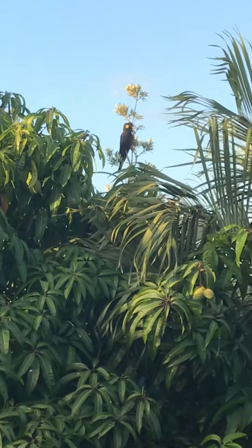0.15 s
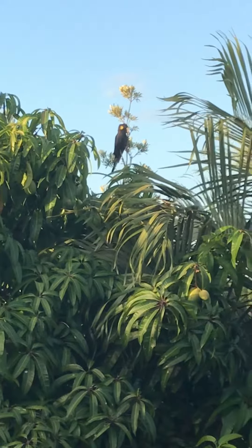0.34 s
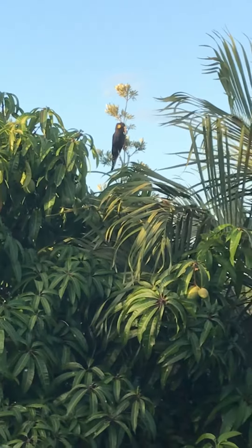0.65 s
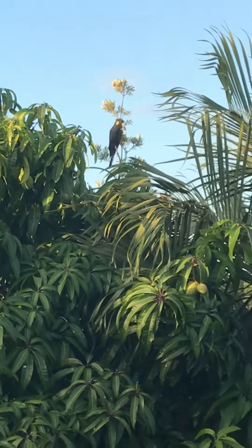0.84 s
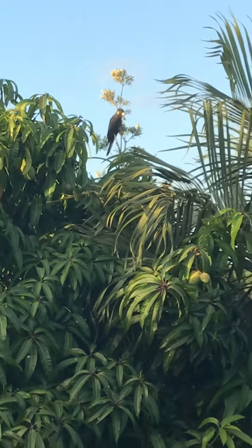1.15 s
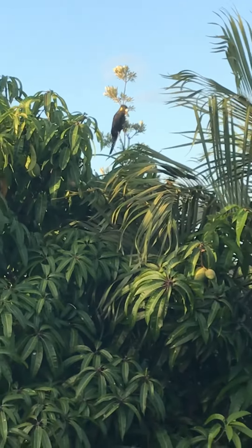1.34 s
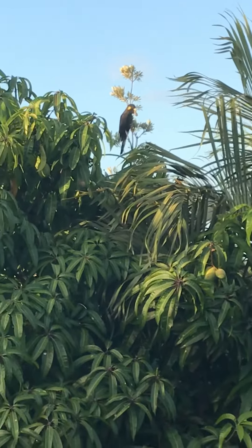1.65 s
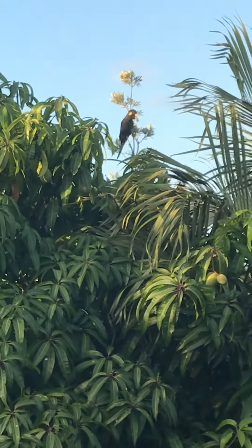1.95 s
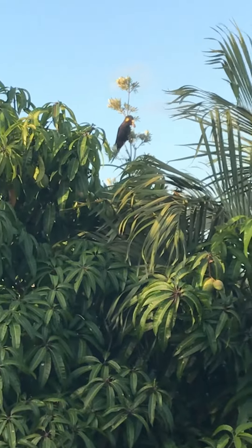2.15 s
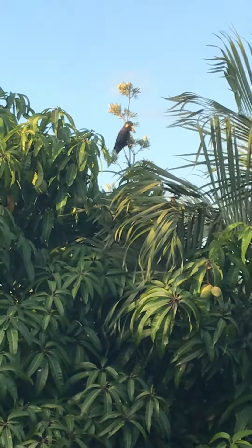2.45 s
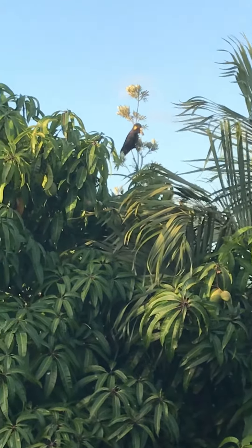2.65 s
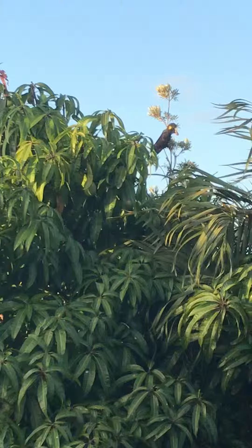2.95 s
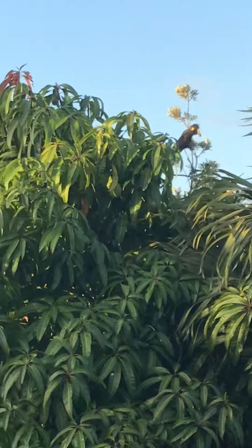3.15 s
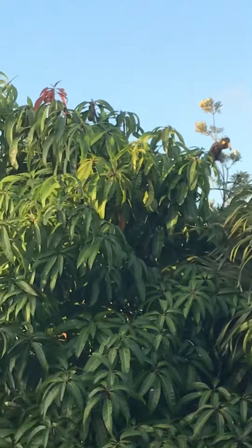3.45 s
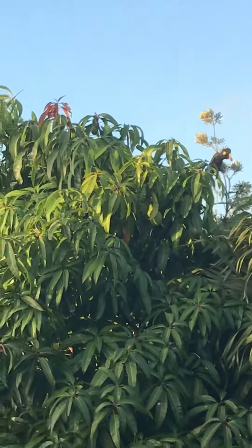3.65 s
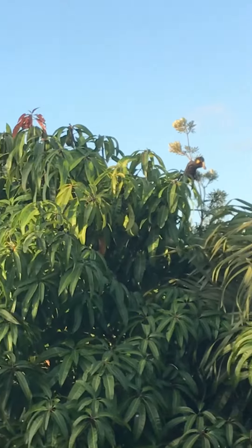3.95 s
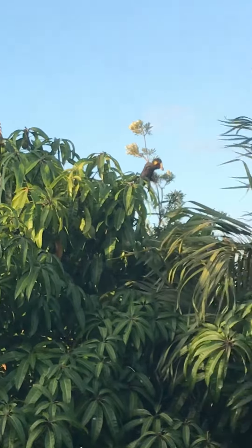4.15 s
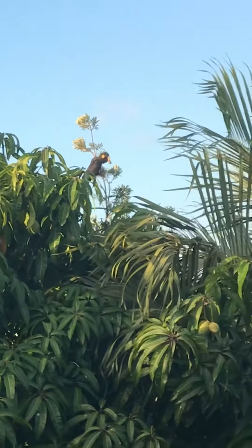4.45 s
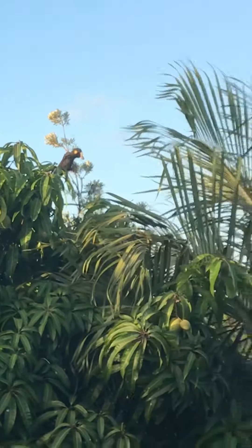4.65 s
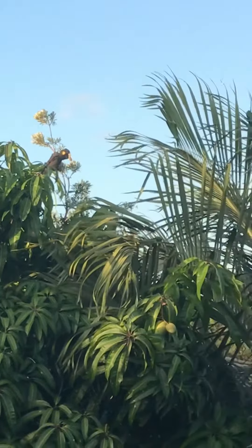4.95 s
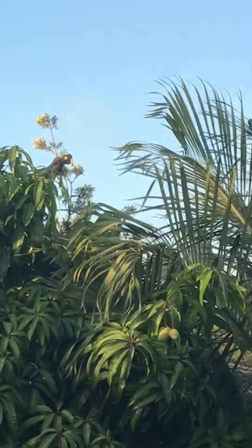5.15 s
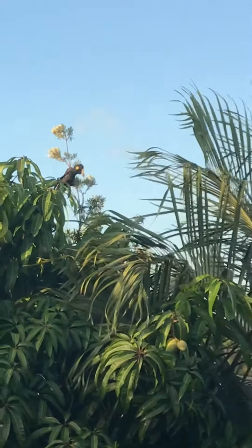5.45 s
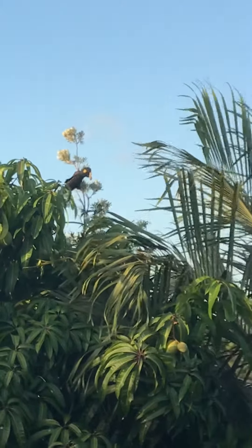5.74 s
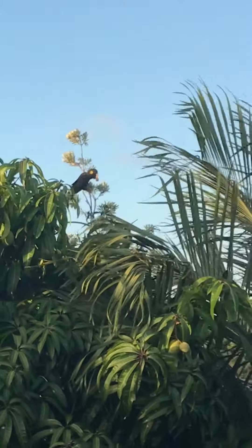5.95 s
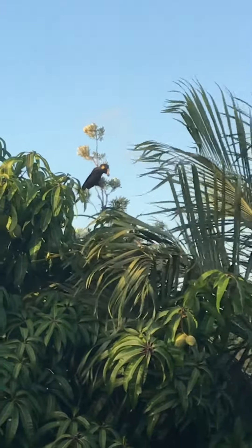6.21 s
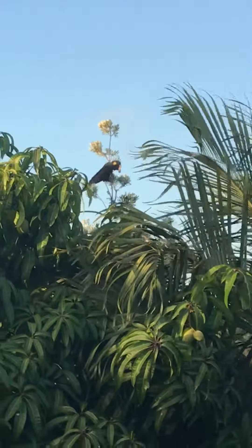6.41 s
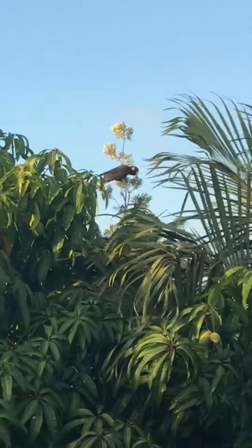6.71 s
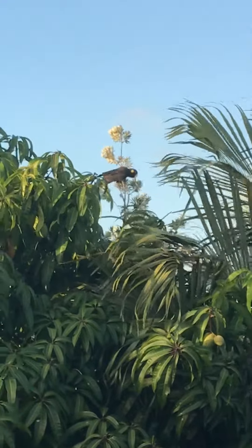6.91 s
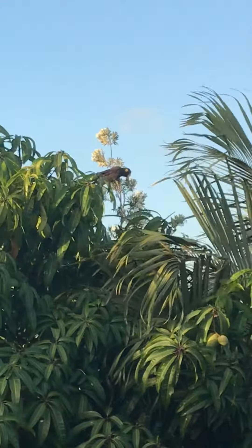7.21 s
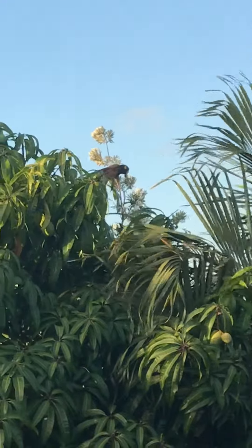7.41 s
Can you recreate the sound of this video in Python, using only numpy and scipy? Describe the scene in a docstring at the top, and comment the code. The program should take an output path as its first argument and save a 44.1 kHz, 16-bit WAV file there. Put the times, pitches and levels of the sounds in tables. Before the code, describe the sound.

A large cockatoo calls from a treetop in a quiet garden. Three long wails each rise from a creak into a piercing, wavering whistle, sag and end in a short torn rasp. The first and last are followed by a softer whine. A brief outdoor echo follows each call. Distant rumble, soft hiss and a few leaf ticks lie behind, heard by a handheld microphone some way off.

```python
"""A black cockatoo in a treetop gives three long wailing calls, two of them trailed by a softer whine.
Each call climbs out of a low creak (harmonics of slow pulses filtered by the throat), locks into a high or
a low whistle (a few harmonics of a nearly steady vibration) and breaks up into a harsh rasp (chaotic slaps
and turbulent air ringing the throat). The garden echoes it briefly with a tail of decaying noise; behind are
a distant rumble, a faint hiss and stirring leaves (all filtered noise) and a few leaf ticks (noise bursts)."""
import sys
import numpy as np
from scipy import signal
from scipy.fft import rfft, irfft
from scipy.io import wavfile
from scipy.ndimage import uniform_filter1d, map_coordinates

SR = 44100
rng = np.random.default_rng(int(sys.argv[2]) if len(sys.argv) > 2 else 0)


def master(y):
    """Save y as 16-bit WAV."""
    cut = np.clip(np.atleast_2d(y).T, -1, 1)
    pcm = np.round(cut * 32767)  # scale
    wavfile.write(sys.argv[1], SR, pcm.astype(np.int16))


N = 333989
T = np.arange(N) / SR  # time in seconds

# Overtones of the low register. Each row: harmonic number, relative level in dB.
LOW_OVERTONES = [(3, 4.5), (4, -3.5), (5, -4.5), (6, -11), (7, -12), (8, -19), (9, -28)]
# As the low register sags, its octave slides into a throat resonance.
# Each row: pitch in Hz, level of the octave over the fundamental in dB.
OCTAVE_LIFT = [(1620, -14), (1690, 10), (1760, -3.5), (1820, -11), (1880, -2.5), (1950, -18.5)]
# Resonances of throat and open beak during the creak. Each row: frequency in Hz, relative level in dB.
THROAT = [(500, -25), (850, -10), (1200, -3.5), (1550, -0.5), (1870, -0.5), (2100, 7.5), (2400, 1.5),
          (2820, -2), (3150, 1.5), (3600, -4), (4400, -5), (5600, -14), (6600, -24.5), (9000, -26.5),
          (13000, -37), (16000, -50)]
# Harsh endings. Each row: start in seconds, end in seconds, level in dB, then relative to that level
# the upper resonance in dB, the treble in dB and the pitched growl in dB.
RASPS = [(1.765, 1.84, -31, -10, -13.5, -4.5), (3.217, 3.368, -30.5, -11.5, -12.5, -1.5),
         (4.862, 5.035, -32, -6.5, -10, -5)]


def undb(db):
    """Logarithmic level: decibels to amplitude gain."""
    return 10 ** (np.asarray(db) / 20)


def unit(x):
    """Power normalisation: scale to rms 1."""
    return x / np.sqrt(np.mean(x ** 2) + 1e-18)


def at_hz(points, hz):
    """Transfer function: gain of a (Hz, dB) spectrum, falling 60 dB per octave outside its ends."""
    f, db = np.transpose(points)
    octave = np.log2(np.maximum(hz, 1))
    outside = np.abs(octave - np.clip(octave, np.log2(f[0]), np.log2(f[-1])))
    return undb(np.interp(octave, np.log2(f), db) - 60 * outside)


def colour(x, points):
    """Linear filtering: multiply the spectrum of a sound by a (Hz, dB) curve; rms 1."""
    hz = np.arange(len(x) // 2 + 1) * SR / len(x)
    return unit(irfft(rfft(x) * at_hz(points, hz), len(x)))


def noise(points):
    """Filtered white noise with a (Hz, dB) spectrum; rms 1."""
    return colour(rng.standard_normal(N), points)


def walk(rate, t=T):
    """Band-limited fluctuation: random values drawn rate times a second, joined smoothly; spread near 1."""
    steps = rng.standard_normal(16384)
    return map_coordinates(steps, [(t - t[0]) * rate], order=2, mode="wrap")


def follow(rows, fade_s=.006):
    """Amplitude gating: sample indices, soft on-off gate and interpolated control curves of one note."""
    s, *columns = np.transpose(rows)
    i = np.flatnonzero((T > s[0] - fade_s) & (T < s[-1] + fade_s))
    to_edge = np.minimum(T[i] - s[0], s[-1] - T[i])
    ramp = np.clip((to_edge + fade_s) / (2 * fade_s), 0, 1)
    return i, np.sin(ramp * np.pi / 2) ** 2, [np.interp(T[i], s, c) for c in columns]


def syrinx(t, hz, waver, jitter, shimmer):
    """Perturbed oscillation: phase and strength of the vibrating membrane, never quite steady."""
    steady_hz = uniform_filter1d(hz, size=400, mode="nearest")
    hz = steady_hz * (1 + waver * walk(73.1, t) + jitter * walk(1500, t))
    return 2 * np.pi * np.cumsum(hz) / SR, 1 + shimmer * walk(1800, t)


def whistles(notes, overtones, gain_db=0, top_db=0, octave_lift=None):
    """Harmonic synthesis: clear wails whose partials flutter independently on the way through the foliage."""
    out = np.zeros(N)
    total_db = 10 * np.log10(sum(undb(db) ** 2 for _, db in overtones))
    flutter_db = 2.1
    for rows in notes:
        i, gate, (hz, level_db, treble_db) = follow(rows)
        phase, strength = syrinx(T[i], hz, waver=.002, jitter=.002, shimmer=.012)
        levels = [level_db]
        if octave_lift:  # fundamental and octave share the level
            lift_db = np.interp(hz, *np.transpose(octave_lift))
            first_db = level_db - 10 * np.log10(1 + undb(lift_db) ** 2)
            levels = [first_db, first_db + lift_db]
        # the overtones together carry the treble level
        levels += [treble_db + top_db + db - total_db for _, db in overtones]
        voice = 0
        for k, db in enumerate(levels, start=1):
            voice = voice + undb(db + flutter_db * walk(93.66, T[i])) * np.sin(k * phase)
        out[i] += gate * (np.sqrt(2) * strength * voice + side_tones(T[i], phase, hz))
    return out * undb(gain_db)


def swoops():
    """Frequency glide: straight sweeps in the low register, louder as the pitch rises."""
    # Quick swoops between a creak and a whistle. Each row: start in seconds, end in seconds, first pitch in Hz,
    # last pitch in Hz, mid-glide level in dB and treble level in dB (both before the gains below).
    glides = [(1.147, 1.181, 1680, 1924, -31.5, -47), (2.057, 2.123, 1620, 2020, -42.5, -56),
              (2.649, 2.678, 1760, 1938, -31.5, -45), (4.265, 4.28, 1662, 1813, -35, -49.5),
              (5.477, 5.507, 1674, 1390, -49, -64)]
    swell_db_per_octave = 36
    notes = []
    for start, end, first_hz, last_hz, db, treble_db in glides:
        half_db = swell_db_per_octave * np.log2(last_hz / first_hz) / 2
        notes.append([(start, first_hz, db - half_db, treble_db - half_db),
                      (end, last_hz, db + half_db, treble_db + half_db)])
    return whistles(notes, LOW_OVERTONES, gain_db=1, top_db=1, octave_lift=OCTAVE_LIFT)


def undertones():
    """Superposition: an unsteady low whistle beats against the high one or shows through the rasp."""
    # The low register swells under the first high wail before it takes over.
    # Each row: time in seconds, pitch in Hz, level in dB.
    undertone = [(1.41, 1916, -43), (1.55, 2032, -35), (1.565, 1853, -23)]
    # In every rasp a remnant of the whistle jumps up and falls back.
    # Each row: share of the rasp from 0 to 1, pitch in Hz, level relative to the rasp in dB.
    rasp_tone = [(0, 1665, -6.5), (.3, 1660, -21), (.42, 2060, -3), (.72, 2070, -7), (1, 1810, -0.5)]
    remnants = [[(start + share * (end - start), hz, rasp_db + db) for share, hz, db in rasp_tone]
                for start, end, rasp_db, *_ in RASPS]
    out = np.zeros(N)
    for rows in [undertone] + remnants:
        i, gate, (hz, db) = follow(rows)
        phase, strength = syrinx(T[i], hz, waver=0.0027, jitter=0.017, shimmer=0.057)
        out[i] += np.sqrt(2) * gate * strength * undb(db) * np.sin(phase)
    return out


def side_tones(t, phase, hz):
    """Subharmonics: lines between the harmonics while the vibration repeats every second or third cycle."""
    # Spans of split vibration. Each row: start in seconds, end in seconds, cycles per repeat, level in dB.
    splits = [(1.088, 1.156, 2, -40), (2.613, 2.65, 2, -41.5), (2.81, 3, 3, -53.5), (4.223, 4.285, 2, -38),
              (4.323, 4.588, 3, -49.5), (4.587, 4.706, 3, -45)]
    slip = 0.6  # radians: the longer cycle is only loosely locked to the whistle or creak
    out = np.zeros(len(t))
    for start, end, cycles, db in splits:
        if start < t[-1] and end > t[0]:
            n = round(cycles)
            between = np.array([k / n for k in range(n, 8 * n) if k % n])
            swell = np.sqrt(np.clip(4 * (t - start) * (end - t) / (end - start) ** 2, 0, 1))
            loose = phase + slip * walk(146.4, t)
            partials = throat(t, loose, hz, between, flutter_db=5)
            out += undb(db + 3 * walk(25, t)) * swell * partials
    return out


def creaks():
    """Source and filter: uneven pulses sweep their harmonics up through throat resonances, air puffing along."""
    # Creaky starts, each one glide, and a last grunt. Each row: start in seconds, end in seconds,
    # first pitch in Hz, last pitch in Hz, first level in dB, last level in dB (of the upper harmonics).
    glides = [(0.958, 1.144, 534, 1015, -48, -29.5), (1.977, 2.065, 777, 1050, -65, -45.5),
              (2.501, 2.655, 665, 1104, -35, -30), (4.119, 4.265, 607, 1027, -39.5, -29.5),
              (5.502, 5.567, 796, 770, -47, -51)]
    # The throat passes little of the fundamental. Each row: pitch in Hz, level in dB.
    fundamental = [(550, -64), (780, -51), (1100, -47.5)]
    puff_db, flutter_db = -11, 4.5
    out, air = np.zeros(N), noise(THROAT)
    for start, end, first_hz, last_hz, first_db, last_db in glides:
        i, gate, (hz, db) = follow([(start, first_hz, first_db), (end, last_hz, last_db)])
        phase, strength = syrinx(T[i], hz, waver=.011, jitter=.014, shimmer=.25)
        puffs = undb(puff_db) * air[i] * np.abs(np.sin(phase / 2))  # one puff a cycle
        harmonics = throat(T[i], phase, hz, np.arange(2, 20), flutter_db)
        voice = undb(db) * (harmonics + puffs)
        voice += np.sqrt(2) * at_hz(fundamental, hz) * np.sin(phase)
        out[i] += gate * (strength * voice + side_tones(T[i], phase, hz))
    return out


def throat(t, phase, hz, multiples, flutter_db):
    """Resonance: multiples of the pitch, weighted by the throat and each fluttering a little; rms near 1."""
    k = multiples[:, None]
    flutter = undb(flutter_db * np.array([walk(60.3, t) for _ in multiples]))
    gains = at_hz(THROAT, k * hz) * (k * hz < SR / 2) * flutter
    # each resonance delays its harmonics differently, which rounds off the pulses
    lag = rng.uniform(0, 2 * np.pi, k.shape)
    return (gains * np.sin(k * phase - lag)).sum(axis=0) / np.sqrt((gains ** 2).sum(axis=0) / 2)


def rasps():
    """Chaotic excitation rings the throat at the end of each call and where the voice cracks."""
    # Throat resonances in the rasp. Each row: frequency in Hz, relative level in dB.
    rasp_throat = [(530, -51), (900, -4), (1240, -27), (1500, -11.5), (1650, -3), (1910, -6.5), (2060, -11),
                   (2290, -10.5), (2890, -4), (3350, -7.5), (3670, -5.5), (4300, 2), (4910, -8),
                   (5930, -11), (6500, -42), (8450, -22), (14300, -120)]
    # Treble of the rasp. Each row: frequency in Hz, relative level in dB.
    rasp_treble = [(3530, -4), (6000, 2.5), (6440, -1.5), (7580, -4), (8380, 2), (9470, 5), (10700, -4),
                   (13300, -5.5), (15500, -27)]
    # Throat resonances in the cracks. Each row: frequency in Hz, relative level in dB.
    crack_throat = [(1000, -44), (1600, -23), (2200, -21), (2800, -7.5), (3400, -15.5), (4200, -7.5),
                    (4800, -13), (5700, -24.5), (6500, -26), (9500, -26.5), (13000, -34), (15500, -40)]
    # Hoarse cracks inside the calls. Each row: start in seconds, peak in seconds, end in seconds,
    # level at the peak in dB.
    cracks = [(1.115, 1.15, 1.2, -44), (1.31, 1.47, 1.52, -47), (1.445, 1.553, 1.578, -32),
              (2.11, 2.12, 2.135, -51), (2.49, 2.505, 2.6, -46), (2.59, 2.645, 2.69, -40),
              (2.957, 2.97, 2.985, -41), (4.235, 4.26, 4.29, -40), (4.3, 4.48, 4.72, -51),
              (4.449, 4.456, 4.467, -31), (4.546, 4.555, 4.57, -41), (5.18, 5.2, 5.22, -48)]
    attack_s, release_db_per_s = 0.028, 494
    source = chaos(slap_hz=415, drift=.08, scatter=.055, turbulence=.6)
    torn = shifting(source, depth_db=4.5, rate=70)
    # the membrane's swing is limited, so the rasp is dense rather than spiky
    ring = np.tanh(.7 * colour(torn, rasp_throat))
    body = colour(ring, [(1100, 0), (3400, 0)])
    upper = colour(ring, [(3800, 0), (5800, 0)])
    treble = colour(source, rasp_treble)
    out = np.zeros(N)
    for start, end, db, upper_db, treble_db, _ in RASPS:
        attack = np.clip((T - start) / attack_s + .5, 0, 1)
        envelope = attack * undb(db - release_db_per_s * np.clip(T - end, 0, 1))
        out += envelope * (body + undb(upper_db) * upper + undb(treble_db) * treble)
    effort = np.zeros(N)
    for start, peak, end, db in cracks:
        effort += undb(db) * np.interp(T, [start, peak, end], [0, 1, 0]) ** 1.3
    return out + effort * colour(source, crack_throat)


def chaos(slap_hz, drift, scatter, turbulence):
    """Irregular collisions: the membrane slaps unevenly and lets a puff of turbulent air through each time."""
    turns = np.cumsum(slap_hz * np.exp(drift * walk(45) + scatter * walk(500))) / SR
    slaps = np.diff(np.floor(turns), prepend=0) * undb(1.5 * walk(600))
    puffs = np.exp(-(turns % 1) / .5) * rng.standard_normal(N)
    spectrum = rfft(unit(slaps) + turbulence * unit(puffs))
    # the low resonances answer later than the high ones, which spreads each slap over a few milliseconds
    hz = np.arange(len(spectrum)) * SR / N
    lag_s = .003 * np.exp(-hz / 3500)
    return irfft(spectrum * np.exp(-2j * np.pi * np.cumsum(lag_s) * SR / N), N)


def shifting(x, depth_db, rate):
    """Band-wise modulation: emphasis jumps between neighbouring bands, so a rasp sounds torn; rms 1."""
    spectrum, hz = rfft(x), np.arange(N // 2 + 1) * SR / N
    spacing_hz = 650
    coarse = T[::100]
    out = np.zeros(N)
    for centre in spacing_hz * np.arange(1, 11):
        band = irfft(spectrum * np.clip(1 - np.abs(hz - centre) / spacing_hz, 0, 1), N)
        out += band * undb(depth_db * np.interp(T, coarse, walk(rate, coarse)))
    return unit(out)


def growls():
    """Partial phase locking: within each rasp the slaps partly lock to a rough, low pitch."""
    growl_hz = 411.3  # the membrane slaps at about a quarter of the whistle's last pitch
    out = np.zeros(N)
    for start, end, db, _, _, growl_db in RASPS:
        i, gate, (hz,) = follow([(start, growl_hz), (end, growl_hz)], fade_s=.01)
        phase, strength = syrinx(T[i], hz, waver=.008, jitter=.012, shimmer=.3)
        harmonics = throat(T[i], phase, hz, np.arange(3, 16), flutter_db=5)
        out[i] += undb(db + growl_db) * gate * strength * harmonics
    return out


def ticks():
    """Impulsive excitation: dry leaves snap against each other and ring briefly as decaying noise."""
    # Leaf ticks. Each row: time in seconds, initial level in dB, decay time constant in seconds.
    snaps = [(1.872, -36, 0.0039), (5.81, -55, .005), (5.826, -49.5, 0.015), (6.366, -50, 0.0015)]
    envelope = sum(undb(db) * (T >= s) * np.exp(-np.abs(T - s) / decay) for s, db, decay in snaps)
    return envelope * noise([(1800, -12), (3000, -1), (4200, 6), (5500, -4), (9000, -7), (13000, -8), (16000, -16)])


def garden(x, wet_db, t60_s, treble_t60_s, delay_s):
    """Reverberation: trees and walls scatter a short tail whose treble dies first."""
    t = T[:SR]
    onset = np.clip(t / delay_s - .5, 0, 1)
    low = colour(rng.standard_normal(SR), [(300, 0), (2500, 0), (6000, -10)]) * undb(-60 * t / t60_s)
    high = colour(rng.standard_normal(SR), [(5000, 0), (16000, -8)]) * undb(-60 * t / treble_t60_s)
    tail = onset * (low + undb(7.5) * high)
    # the tail lasts one second, so its bins are 1 Hz apart: mean power gain 1 from 1.5 to 4 kHz
    tail /= np.sqrt(np.mean(np.abs(rfft(tail)[1500:4000]) ** 2))
    return x + undb(wet_db) * signal.fftconvolve(x, tail)[:N]


def background():
    """Stationary and modulated noise: a distant rumble with gusty bass, a steady hiss and leaves stirring."""
    # Spectrum of the rumble. Each row: frequency in Hz, relative level in dB.
    air_spectrum = [(15, -37), (25, -22), (48, -5.5), (65, 0.5), (92, -3.5), (140, -5), (178, -6.5),
                    (276, -7.5), (308, -10.5), (357, -11.5), (391, -14), (515, -16.5), (926, -9.5),
                    (1490, -14), (2000, -21), (2600, -60), (4400, -120)]
    # Gusts that swell the bass. Each row: centre in seconds, half length in seconds, lift in dB.
    gusts = [(0.175, 0.16, 7.5), (0.437, 0.022, 11), (6.548, 0.13, 8), (7.372, 0.12, 8.5)]
    # Spectrum of the hiss. Each row: frequency in Hz, relative level in dB.
    hiss_spectrum = [(1180, -24), (2000, -0.5), (2160, 6), (2420, -0.5), (2610, 0.5), (3070, -4.5),
                     (4520, -12), (4890, -20), (6770, -8.5), (7570, -20), (8470, -20.5), (10500, -25),
                     (11900, -20.5), (15600, -29)]
    # Breeze in the leaves. Each row: time in seconds, mean level in dB.
    breeze = [(0, -99), (3.6, -73.5), (4.1, -64.5), (7.57, -66)]
    # Spectrum of the leaves. Each row: frequency in Hz, relative level in dB.
    leaf_spectrum = [(1500, -6), (3000, 1.5), (6000, -3.5), (9000, -6), (12500, -9), (16000, -11)]
    air = noise(air_spectrum)
    bass = signal.sosfiltfilt(signal.butter(2, 130, fs=SR, output="sos"), air)
    gust_db = sum(db * np.exp(-((T - s) / half) ** 2) for s, half, db in gusts)
    gusty_bass = bass * undb(gust_db + 0.5 + 2.6 * walk(11))
    rumble = undb(-45) * (air - bass + gusty_bass)
    s, db = np.transpose(breeze)
    leaves = noise(leaf_spectrum) * undb(np.interp(T, s, db) + 0.94 * walk(25))
    return rumble + undb(-61.14) * noise(hiss_spectrum) + leaves


def scene():
    """Superposition of the bird and the leaf ticks, echoed by the garden, over the background."""
    # Wails in the high register, one list a wail. Each row: time in seconds, pitch in Hz, level in dB,
    # level of the treble in dB.
    high_wails = [
        [(1.178, 2540, -32, -40), (1.202, 2600, -32, -42.5), (1.248, 2572, -34.5, -44),
         (1.258, 2532, -45, -39.5), (1.304, 2535, -26.5, -45), (1.338, 2524, -48, -43), (1.356, 2511, -29, -36),
         (1.468, 2435, -29, -45), (1.498, 2508, -32, -46), (1.55, 2420, -39, -52)],
        [(2.116, 2531, -44, -55), (2.156, 2473, -35.5, -56), (2.238, 2452, -43, -55), (2.29, 2263, -35, -59),
         (2.298, 2170, -38, -57)],
        [(2.678, 2470, -25.5, -40), (2.702, 2526, -45, -39.5), (2.734, 2486, -30, -40.5),
         (2.824, 2415, -28, -42), (2.854, 2423, -24.5, -46), (2.898, 2380, -48, -44.5),
         (2.916, 2324, -24, -41.5), (2.944, 2250, -26, -48), (2.96, 2244, -24.5, -45), (2.97, 2248, -27, -52)],
        [(5.065, 2580, -40, -53), (5.093, 2655, -41.5, -60), (5.141, 2464, -37.5, -51),
         (5.21, 2428, -41.5, -70)],
    ]
    # Overtones of the high register. Each row: harmonic number, relative level in dB.
    high_overtones = [(2, 3), (3, -2), (4, -14.5), (5, -12), (6, -25)]
    # Wails in the low register, one list a wail. Each row: time in seconds, pitch in Hz, level in dB,
    # level of the treble in dB (both before the gains below).
    low_wails = [
        [(1.567, 1845, -31, -40), (1.585, 1817, -28.5, -41), (1.645, 1815, -32, -39), (1.677, 1794, -26, -42),
         (1.697, 1760, -37, -36.5), (1.719, 1720, -27.5, -40.5), (1.775, 1628, -31.5, -42)],
        [(2.303, 1790, -41.5, -53), (2.365, 1853, -35.5, -51), (2.387, 1863, -38.5, -55.5),
         (2.48, 1774, -45, -66)],
        [(2.972, 1827, -23, -44), (2.994, 1812, -29.5, -42), (3.01, 1806, -25.5, -44), (3.046, 1908, -30, -51),
         (3.056, 1917, -27, -44), (3.118, 1790, -28.5, -40), (3.14, 1727, -33.5, -42),
         (3.176, 1693, -38.5, -39.5), (3.225, 1644, -25, -44)],
        [(4.28, 1780, -34.5, -49), (4.31, 1867, -27.5, -58), (4.342, 1852, -27.5, -56), (4.38, 1893, -30, -45),
         (4.414, 1900, -29.5, -47), (4.454, 1908, -28.5, -46.5), (4.522, 1872, -32.5, -46),
         (4.552, 1883, -30, -44), (4.678, 1781, -26.5, -39), (4.865, 1678, -31, -35.5)],
        [(5.2, 1952, -34, -64), (5.228, 1866, -48, -63), (5.274, 1877, -33.5, -62), (5.306, 1818, -45, -61),
         (5.402, 1864, -40, -71), (5.47, 1720, -50.5, -61)],
    ]
    high = whistles(high_wails, high_overtones)
    low = whistles(low_wails, LOW_OVERTONES, gain_db=0.55, top_db=-1.0, octave_lift=OCTAVE_LIFT)
    near = high + low + swoops() + undertones() + creaks() + rasps() + growls() + ticks()
    echoed = garden(near, wet_db=-9.7, t60_s=0.44, treble_t60_s=0.24, delay_s=0.0087)
    return (echoed + background())[None]


def record(dry):
    """Band limiting: a steep elliptic low-pass cuts the top above 15.65 kHz."""
    return signal.sosfilt(signal.ellip(10, .2, 70, 15650, fs=SR, output="sos"), dry)


dry = scene()
out = record(dry)
master(out)
```